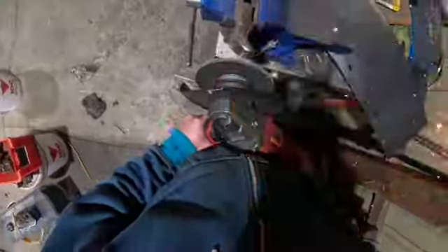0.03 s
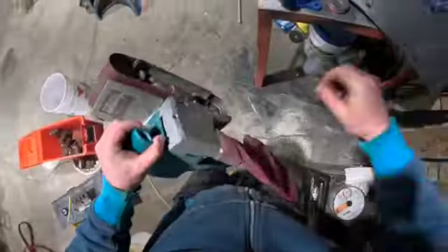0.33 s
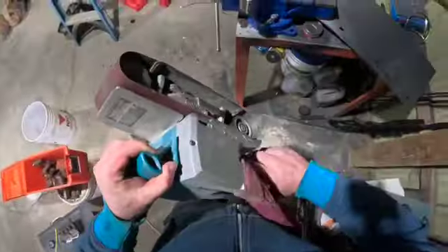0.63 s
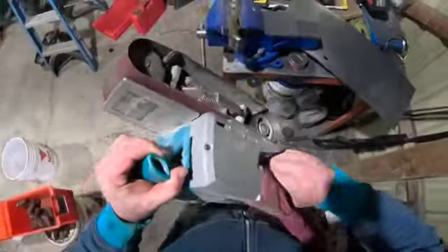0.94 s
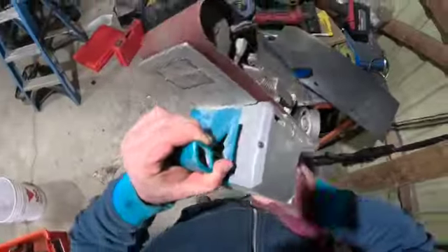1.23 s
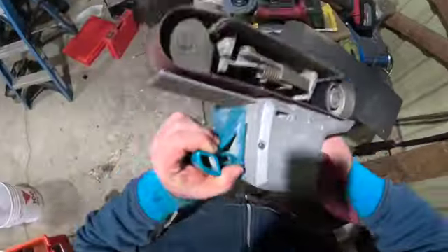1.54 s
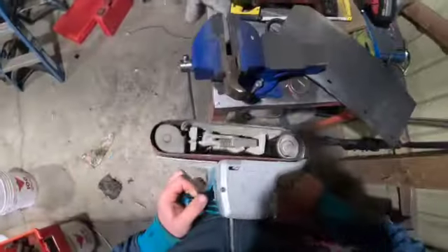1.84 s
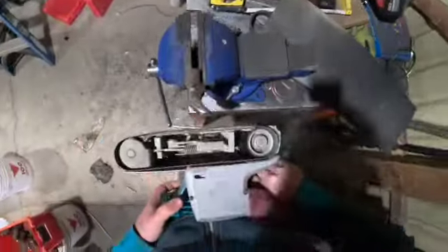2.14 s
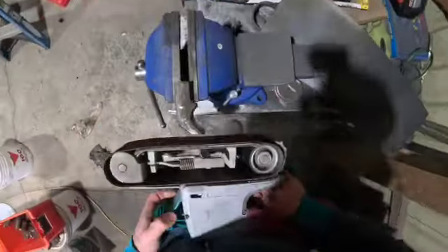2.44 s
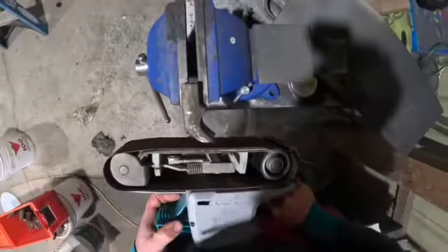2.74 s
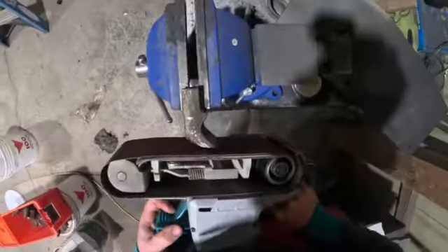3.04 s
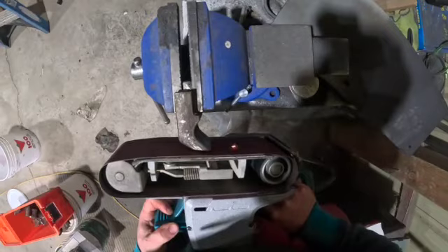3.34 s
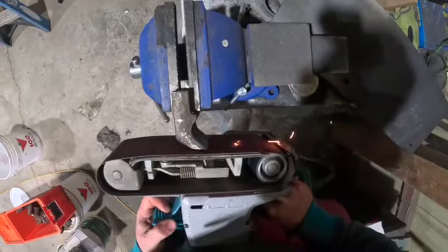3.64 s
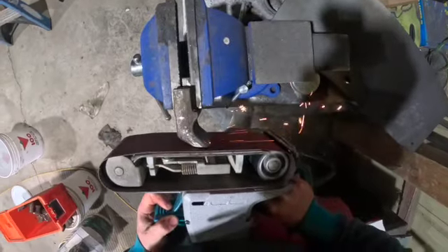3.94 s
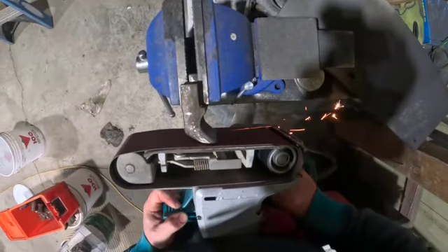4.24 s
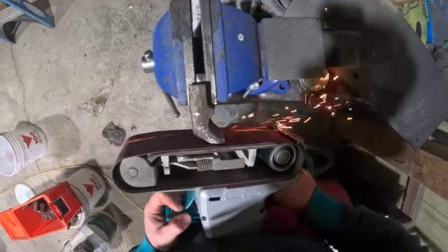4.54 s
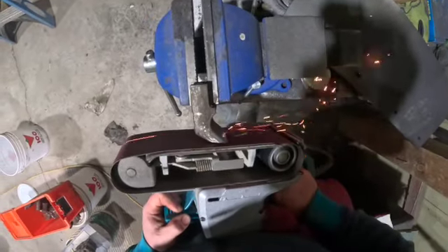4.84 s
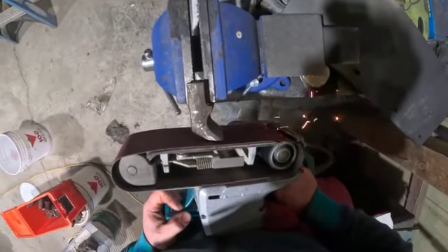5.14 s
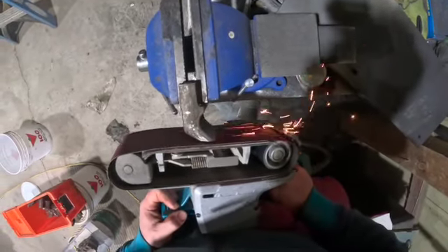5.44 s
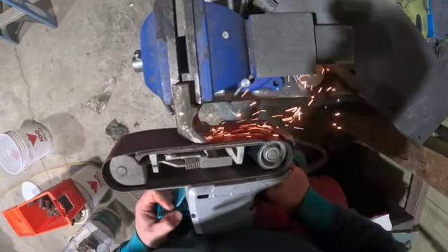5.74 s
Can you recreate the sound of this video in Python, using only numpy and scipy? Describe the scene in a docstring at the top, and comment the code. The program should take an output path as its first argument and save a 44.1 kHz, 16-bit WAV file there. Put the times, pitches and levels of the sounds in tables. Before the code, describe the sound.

An angle grinder rasps and rings on steel, lifts off into a high whine and cuts off abruptly before 0.2 seconds. A hush follows, with faint workshop background and soft, low microphone rumble. From about 0.6 to 1.8 seconds, hands make light, hollow knocks on a belt sander while sleeves rustle, most clearly around 1.2 seconds. At 1.8 seconds the switch crackles, the gears jolt and the motor winds up loudly, its pitch rising quickly and levelling off near 3 seconds into a high whine over whirring gears and belt hiss. Around 3.7 seconds the belt skims a steel part with a slight chatter. Pressure builds gradually, so the whine sags a little and the gritty rasp grows fuller, continuing to the end at about 6 seconds. Everything is close, heard from a head-worn microphone with a short room echo.

```python
"""Angle grinder and belt sander in a workshop.

Heard from a head-worn camera. A grinder disc rasps, leaves the steel and stops abruptly. Hands knock
on a belt sander and sleeves rustle. Its switch sparks and the mains motor winds up with fan, slot
and gear whine. The belt is pressed on a steel part: the motor sags and the grit rasps."""
import sys
import numpy as np
from scipy import signal
from scipy.fft import rfft, irfft
from scipy.io import wavfile
from scipy.ndimage import uniform_filter1d, minimum_filter1d

SR = 44100
rng = np.random.default_rng(int(sys.argv[2]) if len(sys.argv) > 2 else 0)


def pcm_store(signal):
    """Save signal as 16-bit PCM."""
    levels = np.round(np.clip(np.atleast_2d(signal), -1, 1) * 32767)
    wavfile.write(sys.argv[1], SR, levels.astype(np.int16).T)


N = 263718
T = np.arange(N) / SR
HZ = np.fft.rfftfreq(N, 1 / SR) + 1e-3
GRINDER_END_S, SWITCH_S, MAINS_HZ = 0.174, 1.789, 60


def undb(db):
    """Decibels to gain."""
    return 10 ** (np.asarray(db) / 20)


def unit(x):
    """Scale to rms 1."""
    return x / np.sqrt(np.mean(x ** 2))


def curves(table):
    """Each column after t/s, interpolated per sample."""
    s, *columns = np.transpose(table)
    return [np.interp(T, s, c) for c in columns]


def noise():
    """White noise."""
    return rng.standard_normal(N)


def shape(x, gain):
    """Filter by a gain per frequency."""
    return irfft(rfft(x) * gain, N)


def band(gain):
    """Filtered noise, rms 1."""
    return unit(shape(noise(), gain))


def colour(points):
    """Gain through (f/Hz, level/dB) points, rolled off below the first."""
    hz, db = np.transpose(points)
    return undb(np.interp(np.log(HZ), np.log(hz), db)) * np.minimum(HZ / hz[0], 1) ** 2


def resonance(hz, width_hz):
    """One damped mode, gain 1 at centre."""
    return 1 / (1 + 1j * (HZ / hz - hz / HZ) * hz / width_hz)


def body(modes):
    """Direct path plus damped modes."""
    return 1 + sum(undb(db) * resonance(hz, width_hz) for hz, width_hz, db in modes)


def below(hz):
    """Steep low-pass gain."""
    return 1 / (1 + (HZ / hz) ** 6)


def walk(rate_hz):
    """Smooth random drift, rms 1."""
    return band(below(rate_hz))


def grit(gain, spread_db):
    """Dense filtered scratches of unequal size, capped at the largest grain; rms 1."""
    size = np.minimum(rng.exponential(size=N), 4)
    scratches = noise() * undb(spread_db * np.repeat(size, repeats=4)[:N])
    return unit(shape(scratches, gain))


def tone(turns):
    """Sine, rms 1, random start phase."""
    return np.sqrt(2) * np.sin(2 * np.pi * (turns + rng.random()))


def ramp(s, length_s):
    """Linear rise from 0 at s to 1."""
    return np.clip((T - s) / length_s, 0, 1)


def decay(s, t60):
    """Envelope of a blow at s."""
    return ramp(s, 0.0004) * np.exp(-np.log(1000) * np.maximum(T - s, 0) / t60)


def ring(s, hz, t60):
    """One struck mode."""
    return decay(s, t60) * np.sin(2 * np.pi * hz * (T - s))


def swell(s, fade_s):
    """Peak of 1 at s, 20 dB down at fade_s either side."""
    return 10 ** (-np.abs(T - s) / fade_s)


def swells(table):
    """Envelope of a series of movements."""
    return sum(undb(db) * swell(s, fade_s) for s, db, fade_s in table)


# grinder run: t/s, whine f/Hz, whine level/dB, rasp level/dB, ring level/dB
GRINDER_RUN = [(0, 1880, -46, -19.5, -32), (.07, 1900, -33, -20, -30.5), (.105, 1940, -18.5, -22, -56),
               (.15, 1985, -17.5, -25.5, -59), (.175, 2000, -19.5, -26, -58)]
# disc rasp spectrum: f/Hz, level/dB
DISC_SPECTRUM = [(29, -32), (50, -14), (98, -10), (177, -11.5), (389, 2), (964, -1), (1110, 4), (1630, -8),
                 (1880, 0.5), (6660, 0), (10000, -15), (15000, -38)]


def grinder():
    """The disc rasps and rings on steel, then lifts off; its gears whine freely."""
    hz, whine_db, rasp_db, ring_db = curves(GRINDER_RUN)
    turns = np.cumsum(hz) / SR
    whine = undb(whine_db) * tone(turns)
    fan = undb(-32.5) * tone(2.9 * turns + .25 * walk(120)) * ramp(.07, .02)
    rasp = undb(rasp_db) * grit(colour(DISC_SPECTRUM), spread_db=3.5)
    steel = resonance(9950, 400) ** 2 + undb(-16) * resonance(14100, 500) ** 2
    ringing = undb(ring_db) * band(steel)
    hum = undb(-39.5) * tone(81 * T)
    return (whine + fan + rasp + ringing + hum) * (1 - ramp(GRINDER_END_S - .008, 0.012))


# background spectrum: f/Hz, level/dB
SHOP_SPECTRUM = [(40, -2), (130, -10), (250, -10), (450, -20), (950, -21.5), (1330, -5.5), (1900, -20),
                 (7600, -25.5), (12000, -49), (15000, -72)]


def shop():
    """Steady workshop noise."""
    return undb(-56.5) * band(colour(SHOP_SPECTRUM))


# head movements: t/s, level/dB, 20 dB fade/s
HEAD_SWAYS = [(.21, -44, 0.05), (.4, -45, 0.3), (.74, -51, .15), (1.09, -43, 0.1), (1.64, -49, 0.5)]


def sway():
    """The camera rumbles as it sways with the head."""
    return band(resonance(25, 37) * below(73)) * swells(HEAD_SWAYS)


# sleeve strokes: t/s, level/dB, 20 dB fade/s
SLEEVE_STROKES = [(.56, -52.5, .15), (.635, -49, 0.13), (.77, -48, 0.17), (1.14, -37.5, 0.18),
                  (1.24, -52, 0.2), (1.39, -52, 0.17), (1.6, -46, 0.1)]
# cloth spectrum: f/Hz, level/dB
CLOTH_SPECTRUM = [(59, -58), (110, -22), (434, -10), (556, -6), (1300, -9.5), (1530, -7), (1730, -12.5),
                  (2790, -12.5), (6930, -18.5), (14000, -46)]


def sleeves():
    """Sleeves and hands slide over the sander."""
    friction = grit(colour(CLOTH_SPECTRUM), spread_db=3.5)
    return friction * swells(SLEEVE_STROKES) * undb(2.0 * walk(66))


# knocks, trigger last: t/s, level/dB, f/Hz, relative click level/dB, relative shell level/dB
HAND_KNOCKS = [(.615, -31.5, 937, -0.5, -17), (.733, -40.5, 842, -1, -16), (.780, -35, 559, -2, -20),
               (.844, -34, 548, -9, -26), (.927, -38.5, 1042, -5, -7.5), (1.088, -36.5, 516, 6, -12),
               (1.124, -34.5, 480, 4.5, -13), (1.159, -25, 562, -6, -18), (1.186, -33, 532, -14, -24),
               (1.426, -42, 773, -4, -15), (1.546, -52, 760, 11.5, -8), (1.588, -46, 1040, -2, 3),
               (1.637, -34.5, 1005, -8, -13), (1.758, -40, 1480, -2, -18.5), (1.783, -42, 1100, 4, -13.5)]
# contact click spectrum: f/Hz, level/dB
CLICK_SPECTRUM = [(88, -46), (150, -10), (477, -4), (910, -3), (1870, -10), (3570, -4), (6680, -17),
                  (7630, -7.5), (14000, -61)]


def knocks(t60=0.1):
    """Hands strike the hollow sander: a main mode amid lesser ones; hard contacts wake the shell."""
    click = band(colour(CLICK_SPECTRUM))
    shell = band(resonance(2125, 70) ** 2 + resonance(2414, 70) ** 2 + undb(-1) * resonance(307, 56) ** 2)
    total = 0
    for s, db, hz, click_db, shell_db in HAND_KNOCKS:
        cluster = band(resonance(hz, .5 * hz) ** 2) * decay(s, t60)
        contact = undb(click_db - 4) * click * decay(s, 0.057)
        hollow = undb(shell_db) * shell * decay(s, 0.12)
        total += undb(db) * (0.72 * ring(s, hz, t60) + 0.47 * cluster + contact + hollow)
    return total


# contact sparks: t/s, level/dB
SWITCH_SPARKS = [(1.7887, -12), (1.7941, -10.5), (1.801, -16.5), (1.8095, -15)]
# gears taking up slack: t/s, level/dB, f/Hz
GEAR_JOLTS = [(1.7965, -13.5, 827), (1.8114, -14, 930), (1.8271, -10.5, 1008), (1.869, -10.5, 760)]


def switch_on():
    """Contacts spark on the first mains half-waves; torque jolts the gears."""
    crack = band(resonance(3300, 5400) * below(7600))
    sparks = sum(undb(db) * decay(s, 0.017) for s, db in SWITCH_SPARKS) * crack
    jolts = sum(undb(db) * ring(s, hz, 0.064) for s, db, hz in GEAR_JOLTS)
    return sparks + jolts


def effort(speed, press, free_db, slow_db, press_db, snatch_db):
    """Gain of a moving part: builds above half speed, shifts with load, jumps as the belt snatches."""
    slow = np.minimum(2 * (1 - speed), 1)
    snatch = swell(1.878, .07)
    return undb(free_db + slow_db * slow + press_db * press + snatch_db * snatch)


# belt spectra, free and on steel: f/Hz, level/dB
FREE_SPECTRUM = [(25, -27), (74, -18.5), (364, -10), (660, -3), (1100, -3.5), (1500, -6), (2000, -2),
                 (2400, -5.5), (3500, -7), (5000, -10), (7000, -10.5), (9500, -20.5), (11500, -32.5),
                 (15000, -46)]
GRIND_SPECTRUM = [(25, -20), (66, -14), (116, -19), (329, -12.5), (660, -2), (1050, -4), (1460, -7.5),
                  (1900, -3.5), (3400, -8.5), (4900, -9), (7300, -12.5), (9500, -19), (11500, -32),
                  (15000, -45)]
# housing modes: f/Hz, width/Hz, level/dB
HOUSING_MODES = [(672, 47, -10), (1020, 360, -15.5), (2000, 490, -8), (2820, 370, -5.5), (5860, 250, -7),
                 (7400, 390, -26)]


def belt(turns, speed, press):
    """Grit runs over platen and steel and rings the housing; roller and brushes add flutter."""
    housing = body(HOUSING_MODES)
    free = grit(colour(FREE_SPECTRUM) * housing, spread_db=1.4)
    grinding = grit(colour(GRIND_SPECTRUM) * housing, spread_db=2.0)
    scrape = np.sqrt(1 - press) * free + np.sqrt(press) * grinding * undb(0.44 * walk(7.2))
    low, high = below(1607), 1 - below(4220)
    rumble = unit(shape(scrape, low)) * undb(0.57 * walk(25.3))
    rumble *= effort(speed, press, free_db=-23.5, slow_db=-3, press_db=2.5, snatch_db=-1)
    rasp = unit(shape(scrape, 1 - low - high)) * undb(0.5 * walk(25))
    rasp *= effort(speed, press, free_db=-26.5, slow_db=-4.5, press_db=1.1, snatch_db=8.5)
    hiss = unit(shape(scrape, high)) * undb(0.5 * walk(25))
    hiss *= effort(speed, press, free_db=-27, slow_db=-7, press_db=0.2, snatch_db=7)
    roller = 1 + .07 * (1 - press) * tone(turns / 8.3)
    brushes = 1 + 0.054 * tone(2 * MAINS_HZ * T)
    bench_drone = undb(-47) * press * band(resonance(76, 26) ** 2)
    return (rumble + (rasp + hiss * brushes) * roller + bench_drone) * ramp(SWITCH_S, 0.011)


def fan_whine(turns, press, current, inrush, ripple, blades=12):
    """Blade-pass tone: dips at one pitch on the way up, swells briefly near top speed."""
    fan = tone(blades * turns) + undb(-31.5) * tone(2 * blades * turns)
    whistle_db = 5 * swell(3.01, 0.52)
    fan *= undb(-26.3 - 2.5 * press + whistle_db + walk(33))
    fan *= (1 + 0.55 * inrush * walk(100)) * (1 + .6 * current * ripple)
    return shape(fan, 1 - .85 * resonance(3692, 140))


def slot_whine(turns, current, inrush, ripple, slots=14):
    """Armature slots throb with the mains; their tone sweeps through a motor shell mode."""
    throb = 1 + (.95 - inrush) * ripple
    whine = tone(slots * turns) * throb * current * undb(-22 + 1.2 * walk(30))
    whine *= 1 + 0.56 * inrush * walk(140)
    stator = (1 + undb(0.5) * resonance(3000, 260)) * np.sqrt(below(4550))
    return shape(whine, stator)


# gear partials: multiple of mesh rate, level/dB, change at full pressure/dB
GEAR_PARTIALS = [(1, 0, 1.5), (1.5, -14, 3), (2, -17, 0), (2.5, -23, -3), (3, -11.5, -16), (3.5, -25, 9),
                 (4, -14, -1.5)]
# gear case modes: f/Hz, width/Hz, level/dB
CASE_MODES = [(5550, 400, 6), (6900, 330, 19)]


def gears(turns, speed, press, inrush, mesh_per_turn=5.78):
    """Teeth mesh unevenly and rattle their case; load holds them together and shifts the overtones."""
    mesh = mesh_per_turn * turns + (.026 + .12 * inrush) * walk(60)
    teeth = sum(undb(db + load_db * np.sqrt(press)) * tone(k * mesh) * (1 + .3 * walk(70))
                for k, db, load_db in GEAR_PARTIALS)
    whine = shape(teeth, body(CASE_MODES) * below(7400) ** 2)
    whine *= effort(speed, press, free_db=-25.5, slow_db=-12, press_db=-6.5, snatch_db=9)
    whine *= undb(3 * swell(3.85, 0.35))  # chatter as the belt first skims the steel
    rattle = band(resonance(5760, 430) ** 2) * speed ** 4 * undb(-35 - 37 * press)
    return whine + rattle


# pressure on the steel: t/s, share of full
BELT_PRESSURE = [(3.5, 0), (3.78, .14), (4.1, .46), (4.6, .65), (5.1, .8), (5.98, 1)]


def sander(free_hz=334, sag_hz=32, spin_s=1.816):
    """One shaft kicks, climbs and sags under load, driving all parts; returns fan and the rest."""
    kick_share, kick_s, climb_s = .366, .041, .281
    idle_current, load_current, full_slip = 0.055, 0.2, 0.32
    press = curves(BELT_PRESSURE)[0]
    age = np.maximum(T - spin_s, 0)
    wind_up = 1 - kick_share * np.exp(-age / kick_s) - (1 - kick_share) * np.exp(-age / climb_s)
    speed = wind_up - press * sag_hz / free_hz
    turns = np.cumsum(free_hz * speed * (1 + 0.000505 * walk(14.6))) / SR
    current = np.minimum(idle_current + ((1 - speed) / full_slip) ** 1.2 + load_current * press, 1)
    inrush = decay(SWITCH_S, t60=3)
    ripple = np.sin(2 * np.pi * 2 * MAINS_HZ * T)
    shaken = turns + inrush * (.021 * walk(95) + .006 * ripple)  # inrush makes the shaft shudder
    fan = fan_whine(shaken, press, current, inrush, ripple)
    drive = slot_whine(shaken, current, inrush, ripple) + gears(shaken, speed, press, inrush)
    spinning = ramp(1.835, .025)
    return fan * spinning, drive * spinning + belt(turns, speed, press)


def walls(x, t60, wet_db):
    """Short diffuse echo from floor, bench and walls."""
    tail = noise() * decay(0.0033, t60)
    tail /= np.sqrt(np.sum(tail ** 2))
    return shape(x, rfft(tail)) * undb(wet_db)


# microphone port balance: f/Hz, left minus right level/dB
BALANCE_SPECTRUM = [(60, -1), (600, -0.9), (1900, -0.5), (4000, 0.1), (6500, 2), (8500, 0.5), (10500, 4),
                    (12000, 1.5)]
# side echo filter: f/Hz, level/dB
SIDE_SPECTRUM = [(30, -13), (700, -19), (1900, -18), (2500, -29.5), (3800, -12), (4900, -40), (5600, -38),
                 (7000, -39), (8500, -23), (10500, -2), (13000, -1), (15000, 2)]


def scene():
    """Close, central sources; the two microphone ports differ in echo and colour."""
    fan, machine = sander()
    handling_gate = ramp(GRINDER_END_S, .03) * (1 - ramp(SWITCH_S, .02))
    near = knocks() + (sleeves() + sway()) * handling_gate + switch_on() + machine
    mid = shop() + near + fan + walls(near, t60=0.41, wet_db=-17.5) + grinder()
    side = shape(walls(mid, t60=0.2, wet_db=-3.5), colour(SIDE_SPECTRUM))
    side += shape(fan, -1j * undb(-11))  # the fan vents to the right, so that port leads
    hz, db = np.transpose(BALANCE_SPECTRUM)
    lean = undb(np.interp(HZ, hz, db) / 2)
    return np.array([shape(mid, lean) + side, shape(mid, 1 / lean) - side])


def record(dry, ceiling=.48, top_hz=15100):
    """Peak limiter, then a steep low-pass."""
    headroom = ceiling / np.maximum(np.abs(dry).max(axis=0), ceiling)
    gain = uniform_filter1d(minimum_filter1d(headroom, size=89), size=89)
    return signal.sosfilt(signal.ellip(10, .2, 80, top_hz, fs=SR, output="sos"), dry * gain)


dry = scene()
out = record(dry)
pcm_store(out)
```